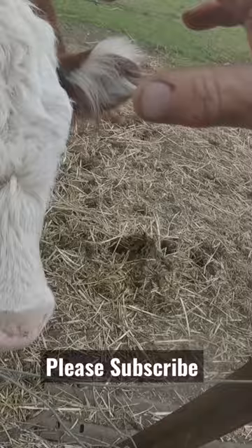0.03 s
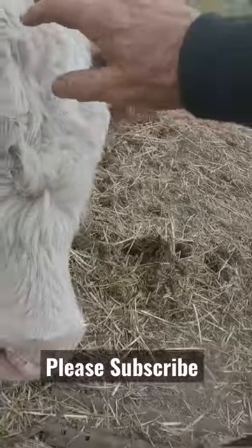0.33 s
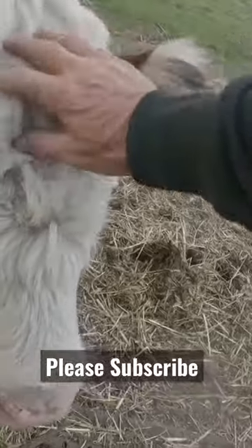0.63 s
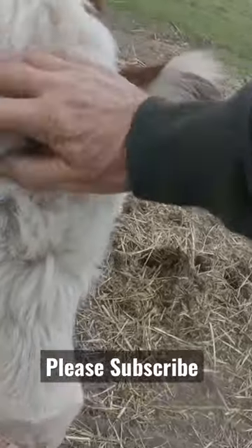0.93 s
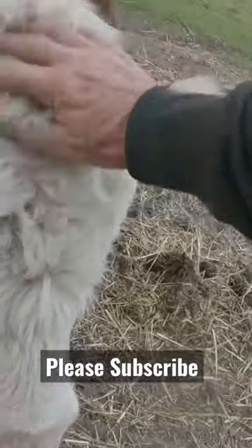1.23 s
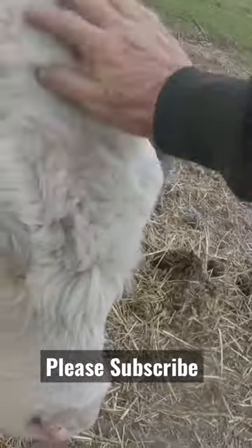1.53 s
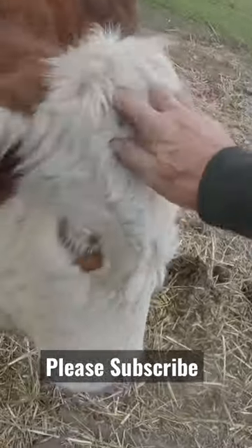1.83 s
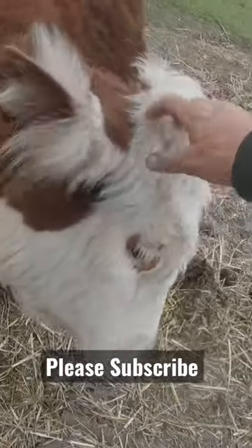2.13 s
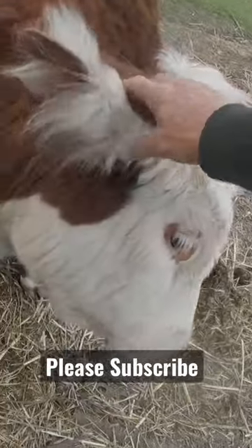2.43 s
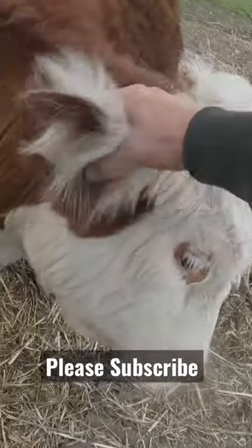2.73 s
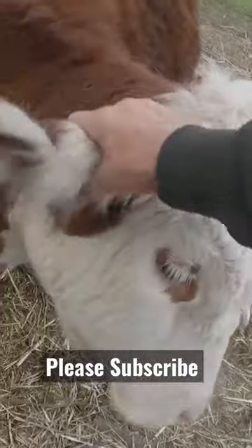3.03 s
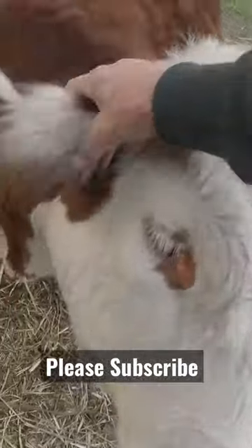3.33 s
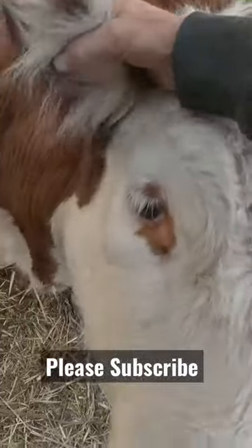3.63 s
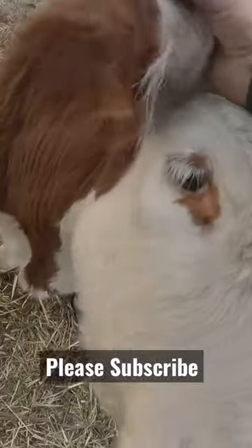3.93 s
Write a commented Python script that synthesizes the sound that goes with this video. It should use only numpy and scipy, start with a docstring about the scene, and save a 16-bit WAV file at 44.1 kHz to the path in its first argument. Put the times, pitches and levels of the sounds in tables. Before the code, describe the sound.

Soft rubbing strokes on a calf's head, with a low revving engine and light wind.

```python
"""A throbbing engine and light wind on the microphone fade in, and at once, up close, a hand scratches
a calf's forehead in quick strokes, later rubbing round its ear: thousands of hairs flick free.
A soft pat, a few dry ticks and a faint squeak sit nearby, and the image widens at the ear.
The engine, probably a tractor's across the field, gathers speed: its firings pulse through the
exhaust pipe over a low roar, a growl and a light clatter."""
import sys
import numpy as np
from scipy import signal
from scipy.fft import rfft, irfft
from scipy.io import wavfile

SR = 44100
rng = np.random.default_rng(int(sys.argv[2]) if len(sys.argv) > 2 else 0)


def file_out(sig):
    """Save sig as 16-bit WAV at sys.argv[1]."""
    # one column per channel
    cols = np.atleast_2d(sig).T
    # limit, then scale
    lim = np.clip(cols, -1, 1)
    pcm = np.round(lim * 32767).astype(np.int16)
    wavfile.write(sys.argv[1], SR, pcm)


N = 176400
T = np.arange(N) / SR
CUTOFF_HZ = 15000

# Hand gestures and squeaks: start t/s, length/s, level/dB
FOREHEAD_STROKES = [(.39, 0.066, -57), (.52, 0.28, -68), (.80, .11, -66), (.915, .11, -60),
                    (1.055, 0.099, -61), (1.175, 0.1, -61), (1.305, .10, -62.5), (1.425, 0.12, -60),
                    (1.555, 0.12, -59.5), (1.70, 0.12, -59.5), (1.85, 0.079, -64), (1.98, 0.071, -65),
                    (3.135, 0.049, -56), (3.455, 0.049, -64)]   # fingers through the hair
EAR_RUBS = [(2.52, 0.14, -65), (2.67, 0.3, -58), (2.97, 0.089, -62.5), (3.08, .19, -57), (3.31, 0.1, -60),
            (3.435, .11, -55), (3.73, 0.13, -55.5), (3.85, .17, -55.5)]   # palm round the ear
PALM_PRESSES = [(.64, 0.22, -56), (1.14, 0.19, -58.5), (1.76, 0.38, -62.5), (2.86, 0.28, -55.5)]   # a softer, duller rub against the hide
SQUEAK_CUES = [(.607, .055, -62), (.69, 0.056, -74)]
# Dry ticks: t/s, peak level/dB, low f/Hz, high f/Hz
TICK_CUES = [(0.4084, -31, 3400, 4700), (.4088, -45.5, 7400, 8340), (.4090, -41, 1040, 1490),
             (.4225, -50, 3000, 7960), (.5586, -38, 510, 685), (0.5599, -32.5, 1010, 1700),
             (2.01, -33, 1326, 3200)]

# Engine firing rate: t/s, f/Hz
FIRING_RATE = [(.3, 44.1), (.8, 43.5), (1.2, 45.9), (1.6, 49.4), (2.0, 49), (2.4, 56.2), (2.8, 60.1),
               (3.2, 63.2), (3.6, 69), (4.0, 81)]
# Exhaust pipe resonances, the base level of each overtone: f/Hz, level/dB
PIPE_RESPONSE = [(85, -49), (112, -46), (140, -58.5), (160, -49.5), (180, -48.5), (200, -59.5), (260, -65),
                 (340, -64), (600, -73)]
# The band the ground echo cancels, sinking and deepening as the engine moves: t/s, f/Hz, level/dB
GROUND_NOTCH = [(.3, 900, -0.5), (.8, 810, -3.5), (1.5, 825, -5), (2.3, 780, -7), (3.0, 681.7, -10.5),
                (4.0, 680, -7.5)]

# Fader curves, before trims and waver: t/s, level/dB
THROB_FADER = [(.3, -31.5), (.5, -30), (.68, -35.5), (.9, -32.5), (1.15, -37.5), (1.42, -43.5),
               (1.6, -38.5), (2.2, -41.5), (2.5, -37), (3.3, -38), (3.8, -40.5), (4.0, -46)]
ROAR_FADER = [(.3, -44), (.45, -39.5), (.6, -39), (.7, -43.5), (1.05, -42.5), (1.4, -46), (1.9, -48.5),
              (2.3, -44), (2.8, -39), (3.3, -39.5), (4.0, -39)]
GROWL_FADER = [(.3, -49.5), (.6, -50), (1.25, -55.5), (1.8, -58.5), (2.3, -55), (3.1, -52), (3.5, -54.5),
               (4.0, -57)]
CLATTER_FADER = [(.3, -55), (.6, -56.5), (1.0, -59.5), (1.55, -59.5), (1.9, -57.5), (2.3, -58.5),
                 (2.7, -56.5), (3.05, -57), (3.3, -57.5), (3.65, -57), (4.0, -56.5)]
WIND_FADER = [(.3, -44), (1.2, -48.5), (2.0, -50), (4.0, -61)]
SIDE_FADER = [(0, -61), (2.7, -59), (2.9, -25.5), (3.5, -16), (3.9, -8.5)]   # stereo side noise, relative to the clatter fader

# EQ curves, the tone of each layer: f/Hz, relative level/dB
STROKE_EQ = [(800, 6.5), (2000, -0.5), (3800, 2), (5500, 0), (6600, -1), (8300, -2), (9700, -10.5),
             (12700, -18.5), (14000, -31), (15000, -36)]
RUB_EQ = [(600, 0), (1500, 7), (3000, 0.5), (4500, -2), (6500, -8.5), (8300, -12.5), (10000, -15.5),
          (12700, -17.5), (14000, -27), (15000, -51)]
PRESS_EQ = [(700, -18), (950, -7), (1170, 8.5), (1400, -7.5), (1750, 0.5), (2400, -17), (4000, -24)]
ROAR_EQ = [(20, 7), (35, -2), (70, 8.5), (105, 5), (140, 5), (210, 2.5), (270, -8.5), (400, -22.5),
           (800, -58)]
GROWL_EQ = [(200, -7.5), (300, 1.5), (350, 0), (430, 2.5), (520, -2.5), (640, -1.5), (800, -6), (1200, -14),
            (2500, -67)]
CLATTER_EQ = [(500, 1), (800, -5.5), (950, 2), (1150, 3), (1400, -0.5), (1800, 0), (2400, -7), (3200, -6),
              (4300, -13.5), (5600, -13), (6500, -19), (8500, -25.5), (9800, -34), (12000, -42),
              (15000, -78)]
WIND_EQ = [(18, -20), (28, -3.5), (40, 6), (70, -12.5), (150, -17)]
SIDE_EQ = [(150, -7), (400, 2.5), (800, -5), (1200, 4), (2000, -1), (4000, -22), (8000, -27), (12000, -19)]


def hair(gestures, eq, hairs_per_s=6000, spread_db=2, flutter_db=1.1):
    """Hairs flick free under the hand, their tiny clicks merging into a grainy swish."""
    flicks = (rng.random(N) < hairs_per_s / SR) * rng.choice([-1, 1], N)
    strength = from_db(spread_db * np.minimum(rng.exponential(1, N), 5))
    flutter = from_db(flutter_db * drift(40))
    return swells(gestures) * flutter * coloured(flicks * strength, eq)


def hair_sheen():
    """The finest hiss of the hair rides on top of the forehead strokes."""
    hiss = rms_one(band(noise(), low_hz=11200, high_hz=CUTOFF_HZ, order=3))
    return from_db(-21.5) * swells(FOREHEAD_STROKES) * hiss


def pat(start_s=0.89, level_db=-33.5, hz=109, rise_s=0.011):
    """The palm settles on the forehead with a dull bump."""
    age = np.maximum(T - start_s, 0)
    envelope = age / rise_s * np.exp(1 - age / rise_s)
    return from_db(level_db) * envelope * np.sin(2 * np.pi * hz * age)


def ticks():
    """Single dry snaps, each ringing briefly in its own band."""
    out = np.zeros(N)
    for s, db, low_hz, high_hz in TICK_CUES:
        impulse = signal.unit_impulse(N, int(s * SR)) + 1e-18
        snap = band(impulse, low_hz, max(high_hz, low_hz + 200))
        out += from_db(db) * snap / np.abs(snap).max()
    return out


def squeaks(hz=5500, width_hz=250):
    """A thin, unsteady whistle of narrow-band noise."""
    return swells(SQUEAK_CUES) * rms_one(band(noise(), hz - width_hz / 2, hz + width_hz / 2))


def exhaust(phase, throb_waver_db=0.24, overtone_waver_db=2.5):
    """The firing tone and its overtones, which swell as they cross the pipe's resonances."""
    throb_db, firing_hz = in_time(THROB_FADER), in_time(FIRING_RATE)
    follow_db = 0.37 * (throb_db - throb_db.mean())   # overtones share part of the throb's swing
    out = from_db(throb_db + throb_waver_db * drift(8.5)) * np.cos(phase)
    for k in range(2, 9):
        overtone_db = at_hz(PIPE_RESPONSE, k * firing_hz) + follow_db + overtone_waver_db * drift(6.6)
        out += from_db(overtone_db) * np.cos(k * phase)
    return -np.sqrt(2) * out


def engine_noise(phase, growl_trim_db=-1, clatter_trim_db=1.76, pulse_depth=0.066):
    """A low roar under a low-mid growl and mechanical clatter; those two pulse with the firings."""
    pulse = 1 + pulse_depth * np.cos(phase)
    roar = from_db(in_time(ROAR_FADER)) * coloured(noise(), ROAR_EQ)
    growl = from_db(in_time(GROWL_FADER) + growl_trim_db) * coloured(noise(), GROWL_EQ)
    clatter_db = in_time(CLATTER_FADER) + clatter_trim_db + 0.25 * drift(30)
    clatter = from_db(clatter_db) * coloured(noise(), CLATTER_EQ)
    return roar + ground_echo(pulse * (growl + clatter))


def ground_echo(x, width_octaves=0.4):
    """The bounce off the field cancels one band: a slowly sweeping notch."""
    hz, s, spectrum = signal.stft(x, SR, nperseg=1024)
    when, notch_hz, notch_db = np.transpose(GROUND_NOTCH)
    octaves = np.log2((hz[:, None] + 1) / np.interp(s, when, notch_hz))
    cut_db = np.interp(s, when, notch_db) * np.exp(-(octaves / width_octaves) ** 2)
    return signal.istft(spectrum * from_db(cut_db), SR)[1][:N]


def wind(gust_db=2.1):
    """Wind buffets the microphone: a deep, lumpy rumble that eases off."""
    return from_db(in_time(WIND_FADER) + gust_db * drift(5)) * coloured(noise(), WIND_EQ)


def side_wash():
    """A noise bed that opens up the stereo image while the hand is at the ear."""
    return from_db(in_time(CLATTER_FADER) + in_time(SIDE_FADER)) * coloured(noise(), SIDE_EQ)


def swells(gestures, tightness=2.65):
    """Each gesture rises and fades in a bell curve; overlaps add in power."""
    power = np.zeros(N)
    for start, length, db in gestures:
        from_centre = (T - start) / length - .5
        power += (from_db(db) * np.exp(-(tightness * from_centre) ** 2)) ** 2
    return np.sqrt(power)


def coloured(x, eq):
    """Apply an EQ curve, rolled off beyond both ends, at unit power."""
    hz = np.maximum(np.arange(N // 2 + 1) * SR / N, 1)
    rolloff = np.minimum(hz / eq[0][0], 1) ** 2 * np.minimum(eq[-1][0] / hz, 1) ** 4
    return rms_one(irfft(rfft(x) * from_db(at_hz(eq, hz)) * rolloff, N))


def drift(rate_hz, hop=40):
    """Smooth random modulation, spread about 1."""
    pole = np.exp(-2 * np.pi * rate_hz * hop / SR)
    jitter = rng.standard_normal(N // hop + 2002)
    slow = signal.lfilter([1], [1, -2 * pole, pole * pole], jitter)[2000:]   # once the filter settles
    return np.interp(np.arange(N) / hop, np.arange(len(slow)), rms_one(slow))


def band(x, low_hz, high_hz, order=2):
    """Band-pass."""
    return signal.sosfilt(signal.butter(order, [low_hz, high_hz], "band", fs=SR, output="sos"), x)


def noise():
    """White noise."""
    return rng.standard_normal(N)


def in_time(rows):
    """An automation curve at every sample."""
    return np.interp(T, *np.transpose(rows))


def at_hz(curve, hz):
    """Read an EQ curve on a log-frequency axis."""
    points_hz, db = np.transpose(curve)
    return np.interp(np.log(hz), np.log(points_hz), db)


def from_db(db):
    """Decibels to gain."""
    return 10 ** (np.asarray(db) / 20)


def rms_one(x):
    """Scale to unit power."""
    return x / np.sqrt(np.mean(x ** 2) + 1e-20)


def scene():
    """Hand and engine sit in the centre, the wash at the sides, the hair's sheen on the right."""
    firing_hz = in_time(FIRING_RATE) * (1 + 0.00394 * drift(5.5))   # the revs waver slightly
    phase = 2 * np.pi * np.cumsum(firing_hz) / SR
    hand = hair(FOREHEAD_STROKES, STROKE_EQ) + hair(EAR_RUBS, RUB_EQ) + hair(PALM_PRESSES, PRESS_EQ)
    engine = exhaust(phase) + engine_noise(phase)
    mid = hand + pat() + ticks() + squeaks() + engine + wind()
    side = side_wash()
    return np.array([mid + side, mid - side + hair_sheen()])


def record(dry, silence_s=0.24, fade_s=0.079):
    """A moment of silence, a quick fade-in and a steep high cut."""
    fade = np.clip((T - silence_s) / fade_s, 0, 1) ** 1.5
    return signal.sosfilt(signal.ellip(10, .1, 80, CUTOFF_HZ, fs=SR, output="sos"), dry * fade)


dry = scene()
out = record(dry)
file_out(out)
```